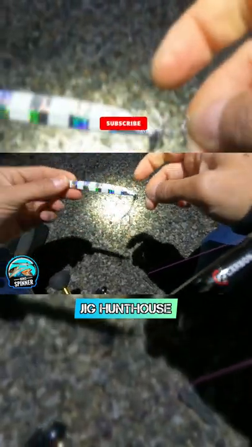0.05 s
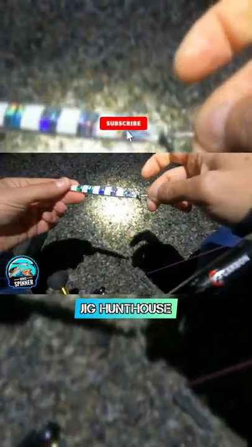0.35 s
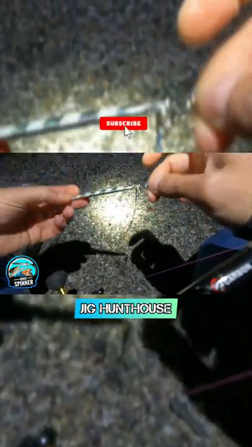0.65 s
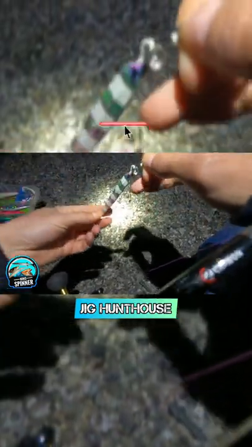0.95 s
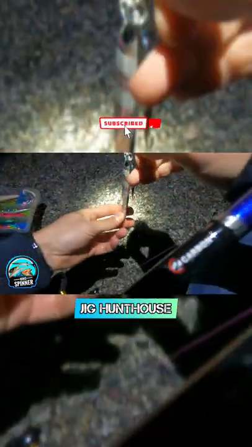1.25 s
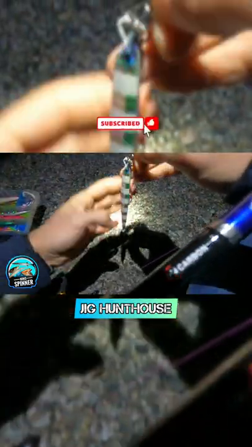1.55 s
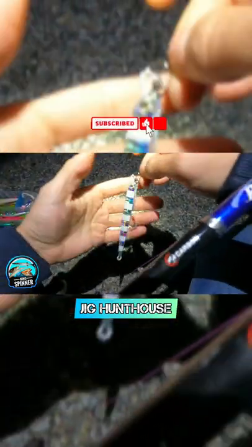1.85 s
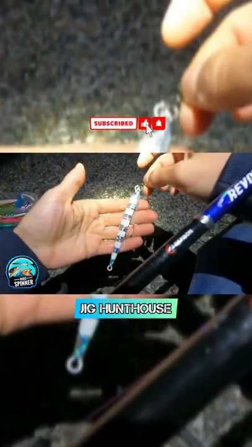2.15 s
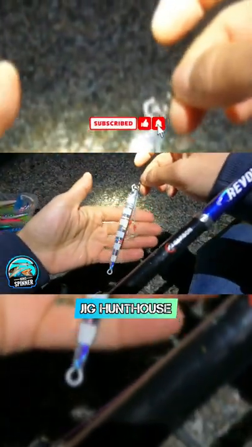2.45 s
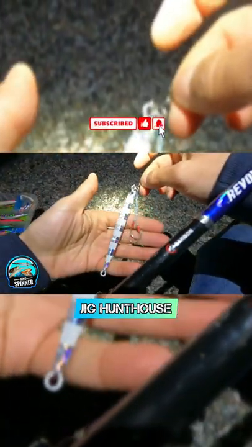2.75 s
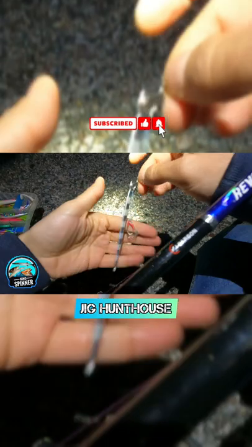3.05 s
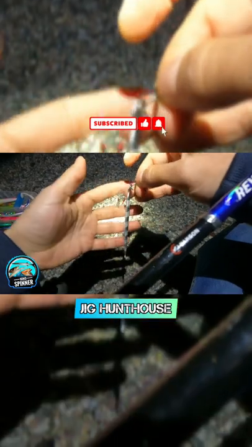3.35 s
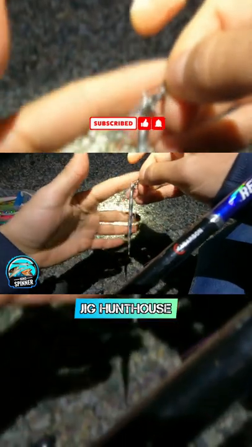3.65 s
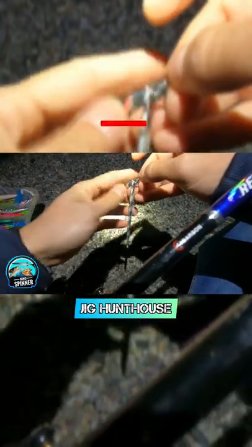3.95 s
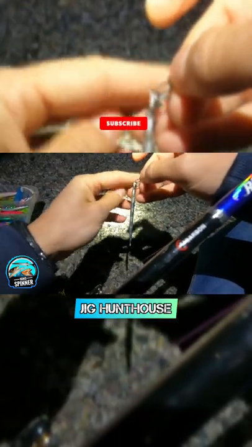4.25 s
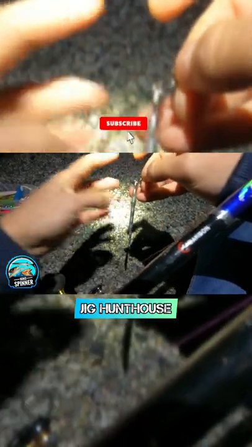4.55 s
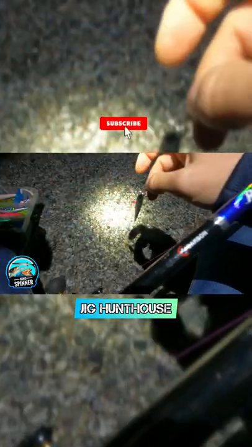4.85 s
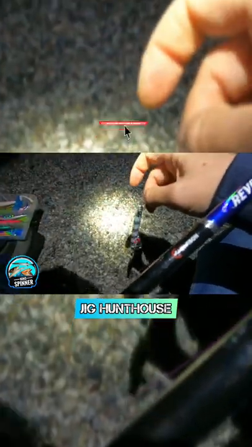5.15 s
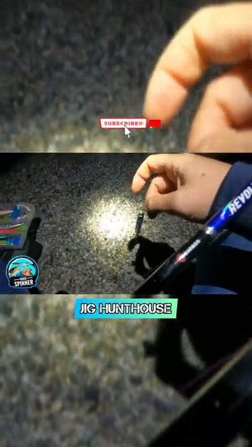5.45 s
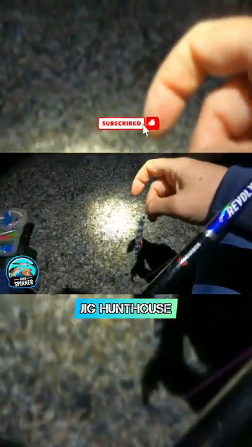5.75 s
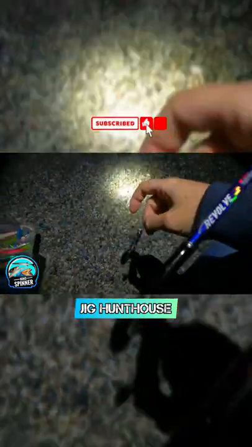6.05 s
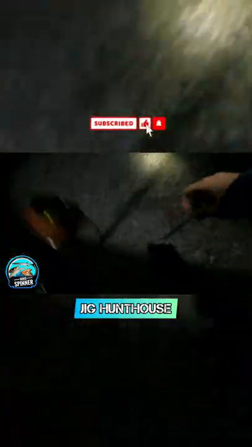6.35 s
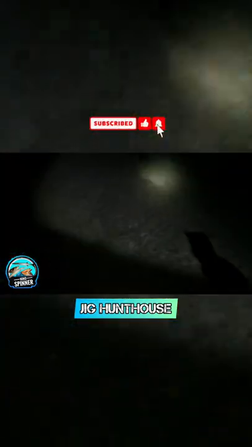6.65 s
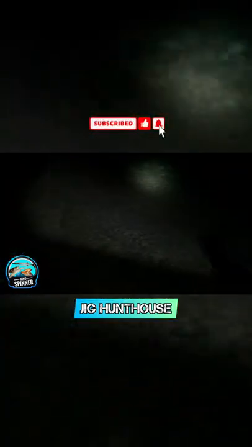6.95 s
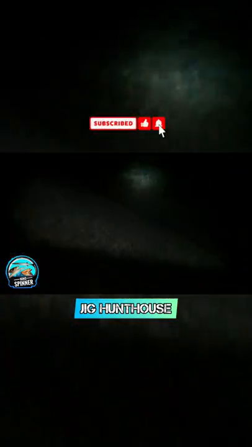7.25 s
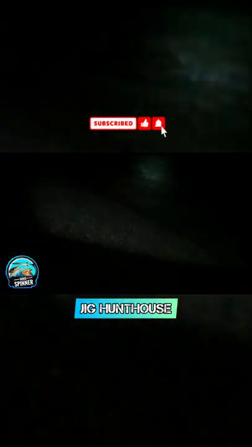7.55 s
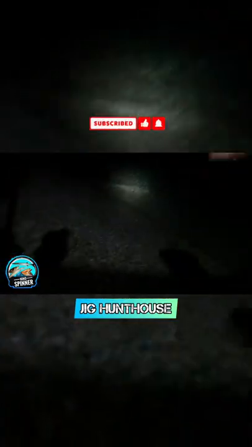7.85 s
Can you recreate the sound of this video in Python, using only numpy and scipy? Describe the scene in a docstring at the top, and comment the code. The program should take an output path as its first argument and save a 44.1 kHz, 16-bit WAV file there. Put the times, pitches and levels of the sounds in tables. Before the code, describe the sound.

Sea water washes softly with small metal clicks, then loud knocks and rubbing hit the microphone, followed by muffled cloth rustle.

```python
"""On a sea shore at night, water washes and plops while an angler handles a lure by a body-worn camera.
Bubbles ring as resonators in the wash; hook and rings click and excite the modes of the metal lure.
A hand bumps and drags over the camera: impact and stick-slip friction drive the housing, whose
cavities colour each microphone port differently. Afterwards the sound is duller and centred,
with sleeve rustle and a few hollow knocks of gear."""
import sys
import numpy as np
from scipy import signal
from scipy.fft import rfft, irfft, next_fast_len
from scipy.io import wavfile
from scipy.ndimage import uniform_filter1d, map_coordinates

SR = 44100
rng = np.random.default_rng(int(sys.argv[2]) if len(sys.argv) > 2 else 0)


def master(y):
    """Save y as 16-bit WAV."""
    cut = np.clip(np.atleast_2d(y).T, -1, 1)
    pcm = np.round(cut * 32767)  # scale
    wavfile.write(sys.argv[1], SR, pcm.astype(np.int16))


N = 348831
T = np.arange(N) / SR


# Hard contacts: knocks on the housing, and early on the small ticks of the lure's tackle. Each row: start in
# seconds, level in dB, pitch in Hz.
KNOCKS = [(1.716, -37.5, 1250), (2.3, -38, 1380), (3.158, -29.5, 684), (5.333, -10, 1470),
          (5.387, -17, 1070), (5.4601, -6.5, 1106), (5.651, -25, 600), (5.763, -18, 520),
          (5.781, -11, 1160), (6.641, -22.5, 1120), (7.01, -40, 1160), (7.141, -34, 920), (7.235, -36, 566),
          (7.721, -23.5, 680), (7.7677, -13, 610)]
# The shell's response. Each row: multiple of the pitch, level in dB.
CLACK = [(.06, -13.5), (.3, -5), (.6, -2), (1, 3), (1.5, -5.5), (2.5, -21), (5, -39), (12, -75)]
def knocks(t60=0.024):
    """Impact excitation: a tap and a brief rattle of the plastic shell, pitched by where it lands."""
    out, t = np.zeros((2, N)), np.arange(SR // 8) / SR
    for s, db, pitch_hz in KNOCKS:
        force = (rng.standard_normal(len(t)) + 1.05 * rng.standard_normal((2, len(t)))) * amp(-60 * t / t60)
        force[:, 0] += 6  # the tap
        blow = shaped(force, [(k * pitch_hz, level) for k, level in CLACK])
        add(out, s, amp(db - 2.5) * blow / np.abs(blow).max(axis=1, keepdims=True))
    return out


# Soft blows on the camera. Each row: start in seconds, peak in dB, pitch in Hz.
THUMPS = [(1.541, -35.5, 232), (1.541, -46, 50), (3.159, -28.5, 228), (3.161, -37.5, 46.3),
          (5.332, -13.5, 35), (5.333, -22.5, 169), (5.385, -9.5, 40), (5.462, -11, 124),
          (5.597, -10.5, 143), (5.607, -11.5, 52.7), (5.655, -15.5, 84), (5.763, -12.5, 141),
          (5.77, -14.5, 48), (5.781, -10, 122), (5.844, -7.5, 157), (6.638, -30.5, 150),
          (6.661, -26.5, 182), (7.24, -24.5, 282), (7.721, -20, 270), (7.768, -10.5, 273),
          (7.777, -17, 240)]
def thumps(decay_cycles=3.57):
    """Heavily damped oscillation: each blow rocks the camera mount for a cycle or two."""
    out = np.zeros(N)
    for s, db, hz in THUMPS:
        t60 = decay_cycles / hz
        add(out, s, ring(db, hz, t60, attack=t60 * 0.083, glide=-0.21))
    return out


# Skin and cloth drag on the housing. Each row: start and end in seconds, then drag, scratch,
# hiss and the swell over the stroke, all in dB.
STROKES = [(5.34, 5.37, -45, -41, -49, -7.5), (5.386, 5.415, -36.5, -38, -63.5, 2),
           (5.416, 5.46, -32, -35, -53.5, -1.5), (5.473, 5.607, -24, -38.5, -61.5, 7.5),
           (5.619, 5.75, -45, -46.5, -63, -15), (5.747, 5.776, -32, -33.5, -48, 18),
           (5.777, 5.799, -25, -36, -59, -18), (5.8, 5.841, -27.5, -34.5, -76, 7)]
# Friction spectra. Each row: frequency in Hz, level in dB.
DRAG = [(30, -3.5), (170, 5.5), (380, -7), (620, 2), (1050, 2), (1500, -14), (2500, -29), (6000, -56)]
SCRATCH = [(600, -35), (1500, 9), (2500, -3), (3700, -13.5), (5000, -21.5), (9000, -53)]
HISS = [(2500, -22), (5000, -1.5), (7500, -8), (10000, -22), (12500, -23), (14000, -35)]
# The hollow under the finger changes size. Each row: time in seconds, multiple of the drag's pitch.
FINGER_BEND = [(5.48, .92), (5.57, 1.05), (5.592, .97), (5.608, .72), (5.63, 1.2), (5.77, 1.05),
               (5.82, 1.3)]
# Resonances of the rubbed shell at each port. Each row: centre in Hz, width in Hz, gain in dB.
SHELL_LEFT = [(540, 81, -1), (670, 59, 4), (770, 166, -14), (1140, 110, -7), (1320, 76, 8), (1900, 210, -6),
              (2920, 270, 8.5), (3750, 840, 8.5)]
SHELL_RIGHT = [(564, 71, 9.5), (653, 59, 9), (944, 125, 5.5), (1130, 340, 6.5), (1750, 330, -6.5),
               (2170, 230, 5), (2650, 230, -1), (3160, 140, -14.5), (3750, 320, 5.5), (13200, 8900, -17)]
# The rubbing reaches the right port out of phase. Each row: frequency in Hz, lag in radians.
RUB_LAG = [(350, 0.4), (550, 2.5), (1000, 0.37), (1200, -1.5), (1400, 0.5), (2200, -2), (6000, -0.5)]
def rubbing(slips_per_s=9000):
    """Stick-slip friction: skin catches and lets go, ringing the shell with a drag, scratch and hiss."""
    drag = bent(grains(DRAG, slips_per_s, spread_db=0, alike=0.97), FINGER_BEND)
    drag *= amp(2 * wobble(260))  # the grip flutters
    scratch = grains(SCRATCH, slips_per_s, spread_db=0, alike=0.83)
    hiss = rush(HISS, alike=0.55, patchy_db=1.5)
    out = np.zeros((2, N))
    for start, end, drag_db, scratch_db, hiss_db, swell_db in STROKES:
        progress = np.clip((T - start) / (end - start), 0, 1)
        contact = np.interp(T, [start - .003, start + .0032, end - .003, end + .0054], [0, 1, 1, 0])
        friction = amp(drag_db) * drag + amp(scratch_db) * scratch + amp(hiss_db) * hiss
        out += contact * amp(swell_db * (progress - .5)) * friction
    rasp = rush([(3000, -15), (5000, 0), (6100, 0), (8000, -20)], alike=0.68, patchy_db=2)
    left, right = out + amp(-47) * swell(5.593, 0.011) * rasp  # skin rasps as one stroke stops
    return np.array([cavities(left, SHELL_LEFT), cavities(delayed(right, RUB_LAG), SHELL_RIGHT)])


# Bumps on the gear. Each row: start in seconds, level in dB, brightness in dB per octave.
BUMPS = [(6.631, -30.5, 3), (6.6405, -20, 0.5), (7.238, -38.5, -2), (7.756, -33.5, 2), (7.769, -17, -11),
         (7.793, -30, -6)]
# Its modes. Each row: frequency in Hz, level in dB, 60 dB decay time in seconds.
HOLLOW_MODES = [(678, -2, 0.04), (830, -3.5, 0.021), (1327, -4.5, 0.054)]
def hollow_gear():
    """Modal vibration: a hollow piece of gear rings briefly at each bump."""
    return struck(BUMPS, HOLLOW_MODES, attack=0.00023)


# Water plops. Each row: start in seconds, level in dB, pitch in Hz.
PLOPS = [(0.226, -31.5, 990), (0.397, -33, 1020), (0.399, -42.5, 239), (0.763, -35.5, 914),
         (2.386, -41.5, 328), (2.48, -40, 177), (3.457, -44, 1240), (3.896, -33.5, 570), (3.995, -42, 564),
         (5.252, -35, 527), (5.29, -38, 583)]
# The wet noise round a plop. Each row: multiple of the pitch, level in dB.
SPLAT = [(.3, -25), (.7, -13.5), (1, 3), (1.4, 4.5), (4, -40), (9, -65)]
def plops(decay_cycles=20):
    """Bubble resonance: trapped air rings after a splat, rising slightly; large, low bubbles last longest."""
    out = np.zeros((2, N))
    for s, db, hz in PLOPS:
        add(out, s, ring(db - 4.5, hz, decay_cycles / hz, attack=0.0037, glide=0.019))
        add(out, s, amp(db - 8) * burst([(k * hz, level) for k, level in SPLAT], t60=0.064))
    return out


# Fingers, hook and rings scrape the lure. Each row: centre in seconds, level in dB, half length in seconds.
SCRAPES = [(1.82, -62, 0.028), (2.488, -64, 0.046), (3.693, -72, 0.096), (3.945, -60, 0.022),
           (4.885, -67, 0.036)]
# The snap and rings click. Each row: start in seconds, peak in dB.
CLICKS = [(.418, -36), (1.07, -38.5), (1.69, -51), (1.736, -45), (2.058, -38.5), (2.083, -45),
          (2.126, -40.5), (3.158, -42.5), (3.299, -42)]
# Spectra of a scrape and a click. Each row: frequency in Hz, level in dB.
CRACKLE = [(1200, -21), (2400, 5), (4000, -1), (5600, -5), (7000, -7), (10000, -22), (13000, -34)]
CLICK_SPECTRUM = [(500, -17), (1100, 3), (2000, -0.5), (3400, 0), (5000, -11), (7000, -25), (12000, -57)]
# Hook and rings strike the lure. Each row: start in seconds, level in dB, brightness in dB per octave.
TINKS = [(1.233, -71, 8), (1.80, -62, -14), (1.825, -69, 8), (3.16, -68, 2), (4.638, -61, -8),
         (4.866, -58, -9), (4.92, -69, 11)]
# The metal's modes. Each row: frequency in Hz, level in dB, 60 dB decay time in seconds.
STEEL_MODES = [(6000, -1, 0.06), (9850, -11, .07), (12090, -21, .06)]
def lure():
    """Friction and impact on metal: scrapes, clicks, and tinks whose modes shift with the contact point."""
    scraping = sum(amp(db) * swell(s, half) for s, db, half in SCRAPES)
    out = scraping * grains(CRACKLE, rate=750, spread_db=-1.5, alike=.7)
    for s, db in CLICKS:
        add(out, s, amp(db) * burst(CLICK_SPECTRUM, t60=0.043))
    return out + struck(TINKS, STEEL_MODES, attack=.0005, scatter=0.0076)


# The sleeve brushes as the arm moves. Each row: peak time in seconds, rumble in dB, swish in dB,
# 60 dB decay time in seconds.
BRUSHES = [(1.11, -50, -75, 0.57), (4.85, -56, -70, .8), (4.97, -48, -69, 1.7), (6.008, -32.5, -40.5, 0.63),
           (6.32, -38, -45, 0.65), (6.645, -40, -39, .11), (7.015, -63, -66, .25), (7.145, -43, -47, 0.12),
           (7.19, -43, -64, .25), (7.24, -46, -46, 0.14), (7.3, -54, -45.5, 1.3), (7.392, -33.5, -43, 0.47),
           (7.47, -39.5, -44, 0.29), (7.679, -43.5, -41, 0.58), (7.78, -32, -44, 0.51),
           (7.864, -32, -54, 1.1)]
def brushing(rise_s=0.25):
    """Incoherent addition: overlapping brushes sum in power, giving envelopes of rumble and swish."""
    power = np.zeros((2, N))
    for s, rumble_db, swish_db, t60 in BRUSHES:
        shape_db = -60 * np.maximum((s - T) / rise_s, (T - s) / t60)
        power += amp(np.add.outer([rumble_db, swish_db], np.maximum(shape_db, -120))) ** 2
    return np.sqrt(power)


# The rumble of cloth. Each row: frequency in Hz, level in dB.
SLEEVE = [(15, 3.5), (35, -5), (150, -3), (300, -13), (420, -17.5), (800, -44), (3000, -99)]
def far_sleeve(rumble):
    """Cloth friction: the sleeve shifts softly as the lure is handled."""
    return rumble * rush(SLEEVE, alike=0.99, patchy_db=1.5)


def near_sleeve(rumble, rest_db=-45, settle_db_per_s=1):
    """Contact noise: the sleeve lies against the camera, settling slowly beneath its brushes."""
    resting = amp(rest_db - settle_db_per_s * (T - CENTRED_AT_S))
    return np.hypot(rumble, resting) * rush(SLEEVE, alike=0.87, patchy_db=1.5)


# The sea swells and ebbs. Each row: time in seconds, then wash, slosh and fizz levels in dB.
SEA_LEVELS = [(0.0, -46, -58.5, -57), (0.27, -54, -63, -61), (0.41, -59, -61.5, -61),
              (0.65, -54.5, -61, -58.5), (0.93, -59, -57.5, -61), (1.32, -51, -55, -60),
              (1.61, -57, -62, -62), (2.15, -54, -60.5, -61.5), (2.31, -56, -66, -61.5),
              (2.6, -49, -58.5, -59), (2.8, -50, -55, -59.5), (3.0, -50, -59.5, -62),
              (3.5, -54.5, -64.5, -61.5), (3.65, -53.5, -56.5, -57.5), (3.85, -53, -54, -58),
              (4.44, -51.5, -56.5, -60.5), (4.68, -51.5, -58.5, -61), (4.87, -51, -59, -61.5),
              (5.3, -52, -52, -61)]
# Spectra of water, foam and air. Each row: frequency in Hz, level in dB.
WASH = [(300, -28.5), (500, -12), (800, -5.5), (1100, 6), (2000, 3), (3000, -24.5), (5000, -36.5),
        (9000, -76)]
SPLASH = [(900, -45), (1400, 0), (2000, -5.5), (2700, -14), (5000, -53)]
FIZZ = [(1200, -33), (2200, -2.5), (3100, -2), (4500, -9.5), (6500, -17), (9000, -28), (12000, -42),
        (14000, -59)]
SLOSH = [(60, -19), (105, -26.5), (150, 2.5), (300, 2), (450, -2), (750, -1), (1200, -7), (3000, -75)]
AIR = [(10, 3.5), (25, 2.5), (45, -13.5), (70, -21.5), (120, -48), (400, -90)]
def sea():
    """Modulated broadband noise: wavelets lap over stones, with a fading splash, foam and moving air."""
    wash_db, slosh_db, fizz_db = curves(SEA_LEVELS)
    wash = rush(WASH, alike=0.65, patchy_db=1.15) + amp(-7.5 + 1.8 * wobble(9)) * gurgle()
    lapping = amp(wash_db - 0.5 + 1.2 * wobble(16))
    splash = amp(-44 - 49 * T) * rush(SPLASH, alike=0.81, patchy_db=2)
    fizz = rush(FIZZ, alike=.65, patchy_db=.5)
    fizz += amp(-6) * grains(FIZZ, rate=1200, spread_db=2.5, alike=.65)  # bursting foam
    slosh = rush(SLOSH, alike=.55, patchy_db=2.5) * amp(1.2 * wobble(12))
    air = rush(AIR, alike=0.99, patchy_db=4) * amp(-57 + 2.5 * wobble(4.56))
    return lapping * wash + splash + amp(fizz_db - 0.5) * fizz + amp(slosh_db + 3.5) * slosh + air


def gurgle(bubbles_per_s=160, centre_hz=1274, log_spread=0.12, decay_cycles=22):
    """Superposed resonators: small bubbles among the stones, each with its own pitch, size and side."""
    draws = rng.random((4000, 4))
    t, out = np.arange(SR // 25) / SR, np.zeros((2, N))
    for when, pitch, size, side in draws[:int(bubbles_per_s * N / SR)]:
        hz = centre_hz * np.exp(log_spread * np.sqrt(3) * (2 * pitch - 1))
        cycles = hz * t
        envelope = amp(-60 * cycles / decay_cycles) * (1 - np.exp(-cycles / 2))
        wave = envelope * np.sin(2 * np.pi * cycles * (1 + 0.058 * cycles / decay_cycles))
        add(out, when * T[-1], amp(9 * size) * np.outer([.5 + side, 1.5 - side], wave))
    return unit(out)


# The sea once the sound is centred. Each row: time in seconds, level in dB.
LATE_SEA = [(5.88, -57.5), (6.1, -54), (6.55, -53), (6.92, -49), (7.2, -52), (7.6, -49), (7.9, -52)]
# Its duller spectrum. Each row: frequency in Hz, level in dB.
LATE_WASH = [(200, -19.5), (500, 4.5), (850, 1), (1300, -3.5), (2000, -12), (3000, -18.5), (5000, -36),
             (9000, -82.5)]
def dull_wash_and_swish(swish):
    """Power summation: the duller sea and the sleeve's swish share noise bands; the cloth hisses once."""
    water = amp(curves(LATE_SEA)[0])
    wash = np.hypot(water, swish) * rush(LATE_WASH, alike=1, patchy_db=2)
    fizz = np.hypot(water, amp(-10.5) * swish) * rush(FIZZ, alike=0.98, patchy_db=3)
    hiss = amp(-68) * swell(7.285, 0.05) * rush(HISS, alike=0.78, patchy_db=4)
    return wash + amp(-18) * fizz + hiss


def ring(db, hz, t60, attack, glide):
    """Damped oscillation with a soft start; the pitch moves by the fraction glide over t60."""
    t = np.arange(SR // 4) / SR
    phase = 2 * np.pi * hz * t * (1 + glide * np.minimum(t / t60, 1) / 2)
    wave = np.sin(phase) * amp(-60 * t / t60) * (1 - np.exp(-t / attack)) ** 2
    return amp(db) * wave / np.abs(wave).max()


def struck(hits, modes, attack, scatter=0):
    """Modal superposition: each hit rings the modes at new strengths, detuned by the fraction scatter."""
    out = np.zeros(N)
    for s, db, bright_db in hits:
        for (hz, level, t60), (chance_db, shift) in zip(modes, rng.standard_normal((len(modes), 2))):
            mode_db = db + level + bright_db * np.log2(hz / modes[0][0]) + chance_db
            add(out, s, ring(mode_db, hz * (1 + scatter * shift), t60, attack, glide=0))
    return out


def burst(spectrum, t60):
    """Exponential decay of a puff of stereo noise, peak 1."""
    t = np.arange(SR // 8) / SR
    noise = rng.standard_normal(len(t)) + 0.74 * rng.standard_normal((2, len(t)))
    puff = shaped(noise * amp(-60 * t / t60), spectrum)
    return puff / np.abs(puff).max()


def rush(spectrum, alike, patchy_db):
    """Stereo noise with random gain in patches of time and frequency, rms 1."""
    bins = signal.stft(rng.standard_normal((3, N)), nperseg=512)[2]
    patches = uniform_filter1d(rng.standard_normal(bins.shape[1:]), size=5, axis=0)
    patches = uniform_filter1d(patches, size=7, axis=1)
    noise = signal.istft(bins * amp(patchy_db * unit(patches)), nperseg=512)[1][:, :N]
    return unit(shaped(stereo(noise, alike), spectrum))


def grains(spectrum, rate, spread_db, alike):
    """Shot noise: rate tiny stereo impulses a second, of uneven size, rms 1."""
    sizes = (rng.random(N) < rate / SR) * amp(spread_db * np.clip(rng.standard_normal(N), -2, 2))
    return unit(shaped(sizes * stereo(rng.standard_normal((3, N)), alike), spectrum))


def stereo(noises, alike):
    """Partial coherence: alike is the share of power common to both ports."""
    return np.sqrt(alike) * noises[2] + np.sqrt(1 - alike) * noises[:2]


def cavities(x, modes):
    """Cavity resonance: the housing lifts and hollows bands on the way to a port."""
    return coloured(x, lambda f: sum(db * .5 ** ((2 * (f - hz) / width) ** 2) for hz, width, db in modes))


def delayed(x, lag):
    """Diffraction round the housing: each frequency has its own phase lag."""
    m = next_fast_len(N + SR // 2)
    return irfft(rfft(x, m) * np.exp(-1j * along(lag, np.fft.rfftfreq(m, 1 / SR))), m)[:N]


def bent(pair, bend):
    """Time scaling: a varying speed slides all resonances together."""
    place = np.cumsum(curves(bend)[0])
    return np.array([map_coordinates(side, [place], mode="wrap") for side in pair])


def coloured(x, gain_db):
    """Minimum-phase (causal) filter; gain_db is a function of frequency."""
    n = x.shape[-1]
    m = 2 * next_fast_len(n // 2 + 4096)
    cepstrum = irfft(np.log(amp(gain_db(np.fft.rfftfreq(m, 1 / SR))) + 1e-6))
    cepstrum[1:m // 2] *= 2
    cepstrum[m // 2 + 1:] = 0
    return irfft(rfft(x, m) * np.exp(rfft(cepstrum)), m)[..., :n]


def shaped(x, spectrum):
    """Filtering by (Hz, dB) points."""
    return coloured(x, lambda hz: along(spectrum, hz))


def along(points, hz):
    """Interpolation of (Hz, value) points on a log axis."""
    f, v = np.transpose(points)
    return np.interp(np.log(hz + 1), np.log(f + 1), v)


def curves(rows):
    """Linear interpolation in time of each column after the first."""
    s, *cols = np.transpose(rows)
    return [np.interp(T, s, c) for c in cols]


def wobble(rate):
    """Smooth random modulation, rate knots a second."""
    return map_coordinates(rng.standard_normal(int(N * rate / SR) + 4), [T * rate])


def swell(centre_s, half_s):
    """Gaussian envelope."""
    return np.exp(-((T - centre_s) / half_s) ** 2)


def amp(db):
    """Decibels to gain."""
    return 10 ** (np.asarray(db) / 20)


def unit(x):
    """Normalisation to rms 1."""
    return x / np.sqrt(np.mean(x ** 2) + 1e-20)


def add(track, s, sound):
    """Superposition of a sound on a track at s seconds."""
    part = track[..., round(s * SR):][..., :sound.shape[-1]]
    part += sound[..., :part.shape[-1]]


# Housing cavities: left, right and once centred. Each row: centre in Hz, width in Hz, gain in dB.
LEFT_CAVITIES = [(620, 75, 2), (780, 197, -7), (967, 184, 7.5), (1260, 152, 11.5), (1614, 207, 7.5),
                 (2030, 300, -4.5), (2325, 290, 4), (3370, 840, 6), (6200, 490, -5.5), (11800, 540, 8)]
RIGHT_CAVITIES = [(570.5, 64, 11), (678, 52, 5), (976, 220, 6), (1188, 186, 7.5), (1435, 380, -3.5),
                  (2130, 260, 5.5), (5400, 480, -5), (12540, 10000, -12)]
CENTRE_CAVITIES = [(293, 47, 4.5), (479, 120, -6.5), (616, 55, -6), (700, 130, -0.5), (848, 83, -5),
                   (1040, 120, -4), (1304, 140, 8.5), (1690, 183, 6), (2294, 250, 6.5), (2860, 210, 3),
                   (3190, 160, -5), (3860, 206, 3), (11000, 4000, -3.5)]
# Airborne sound reaches the right port late. Each row: frequency in Hz, lag in radians.
PORT_LAG = [(350, 0), (560, 2.0), (800, 0.96), (950, 0.5), (1250, 4), (1380, 5), (1550, 2), (2300, 3),
            (3400, 4.5), (4200, 6)]
# The sleeve softens the late knocks. Each row: frequency in Hz, gain in dB.
MUFFLE = [(1600, 2), (3000, -7), (6000, -15)]
CENTRED_AT_S = 5.862
def scene():
    """Source and filter: two differently coloured ports at first, then one centred sound."""
    contacts = knocks()
    rumble, swish = brushing()
    left, right = sea() + plops() + lure() + far_sleeve(rumble)
    # knocks travel through the shell and reach both ports together
    wide = np.array([cavities(left + contacts[0], LEFT_CAVITIES),
                     cavities(delayed(right, PORT_LAG) + contacts[1], RIGHT_CAVITIES)])
    cloth_and_sea = (near_sleeve(rumble) + dull_wash_and_swish(swish))[0]
    centred = cavities(cloth_and_sea + shaped(contacts[0], MUFFLE), CENTRE_CAVITIES) + hollow_gear()
    blend = np.clip((T - CENTRED_AT_S) / 0.017 + .5, 0, 1)
    return (1 - blend) * (wide + rubbing()) + blend * centred + thumps()


def record(dry):
    """Band limiting: the camera cuts off steeply above 13 kHz; a brief fade closes the sound."""
    m = next_fast_len(N + SR // 2)
    closing = np.clip((T[-1] - T) / .004, 0, 1)
    attenuation = np.sqrt(1 + (np.fft.rfftfreq(m, 1 / SR) / 13000) ** 80)
    return irfft(rfft(dry * closing, m) / attenuation, m)[:, :N]


dry = scene()
out = record(dry)
master(out)
```